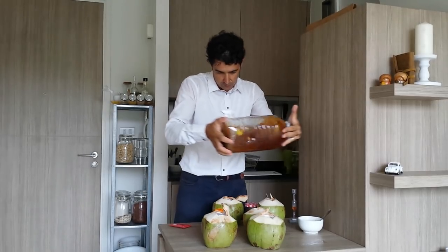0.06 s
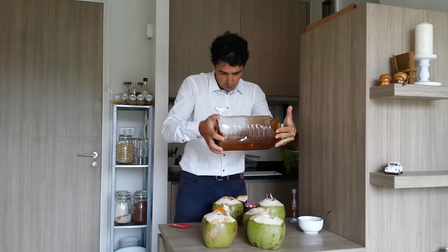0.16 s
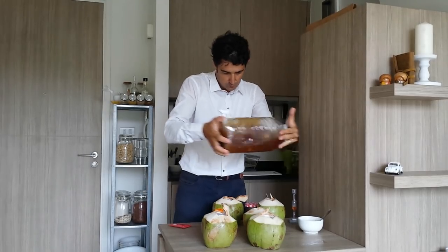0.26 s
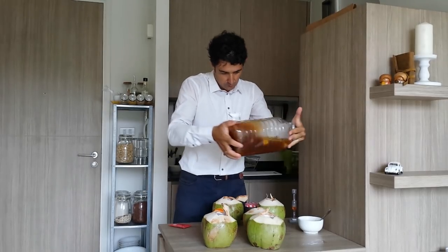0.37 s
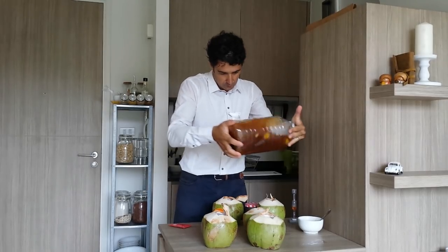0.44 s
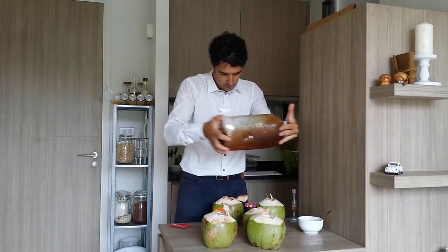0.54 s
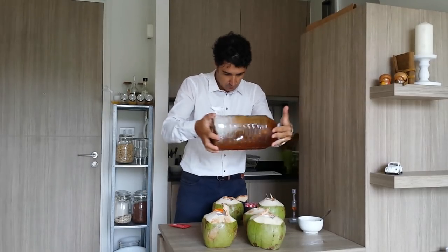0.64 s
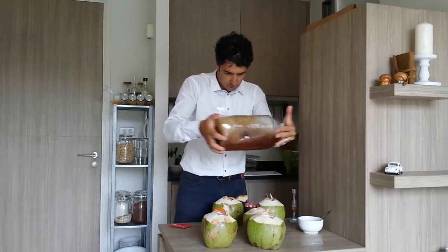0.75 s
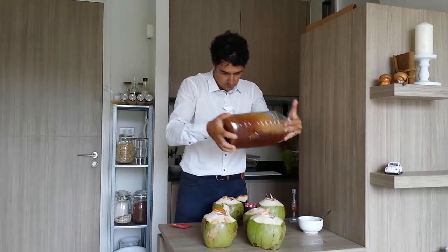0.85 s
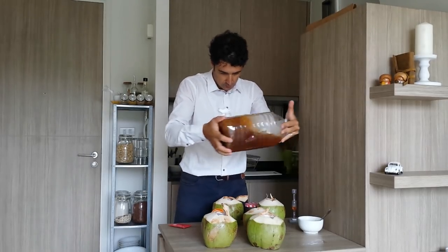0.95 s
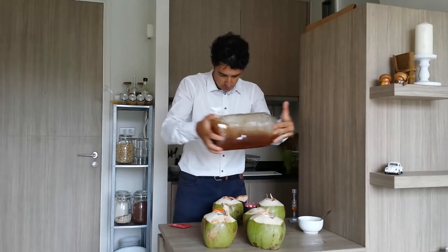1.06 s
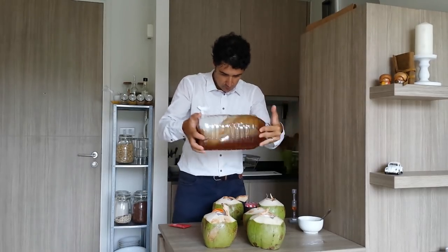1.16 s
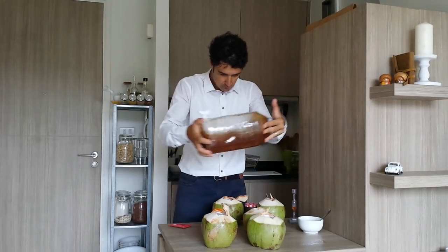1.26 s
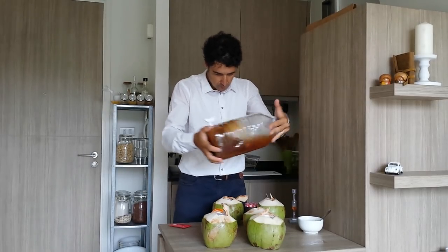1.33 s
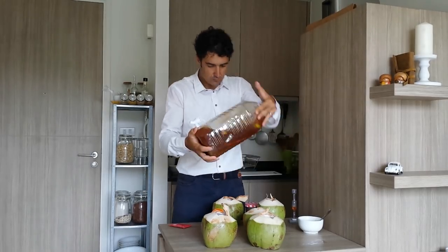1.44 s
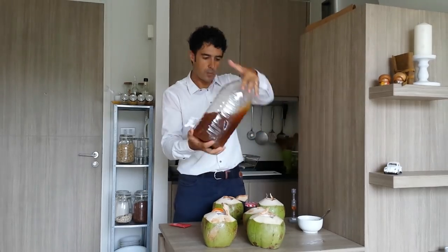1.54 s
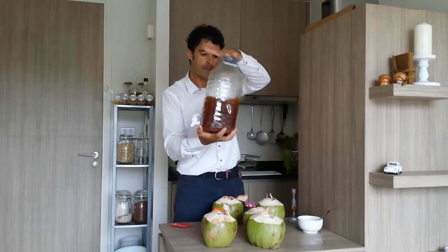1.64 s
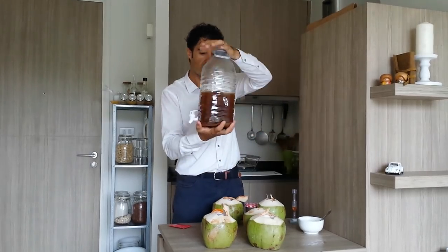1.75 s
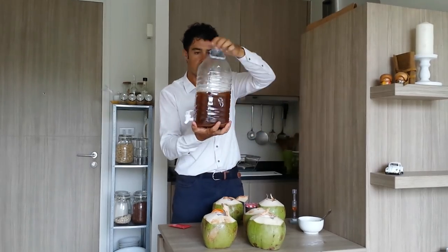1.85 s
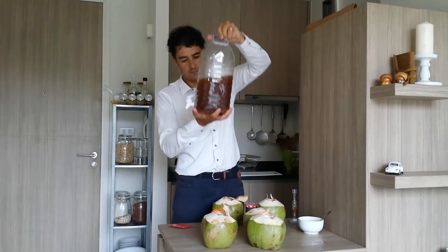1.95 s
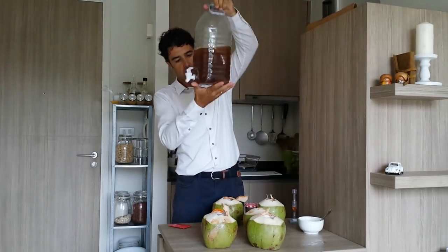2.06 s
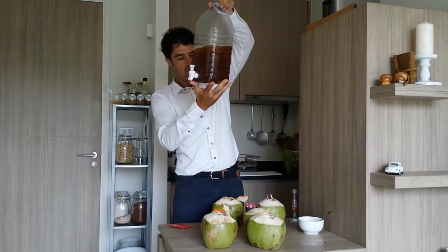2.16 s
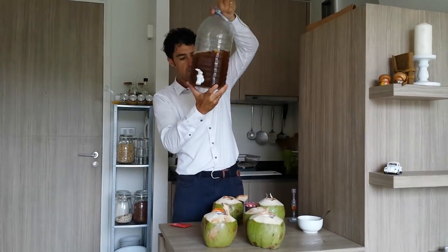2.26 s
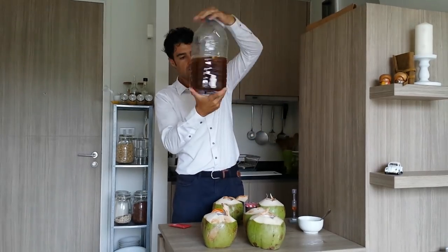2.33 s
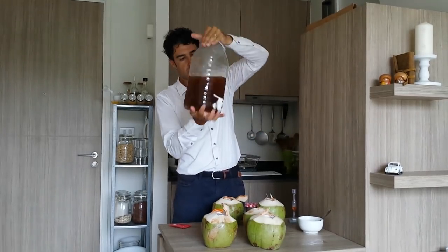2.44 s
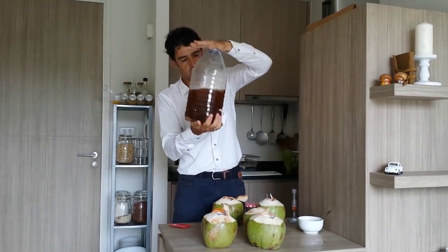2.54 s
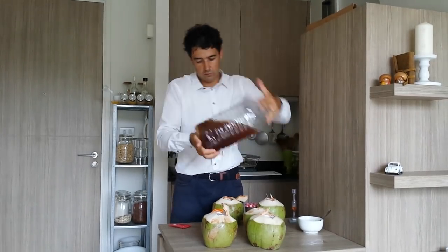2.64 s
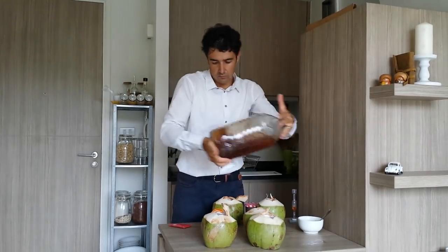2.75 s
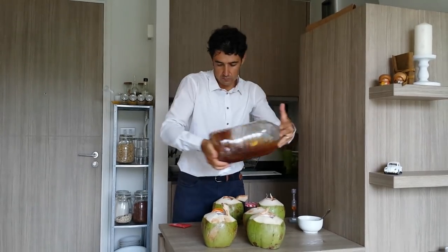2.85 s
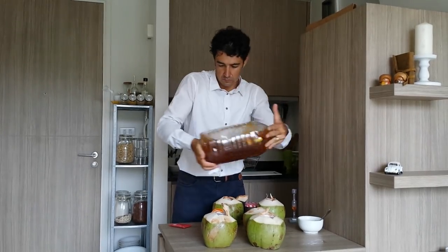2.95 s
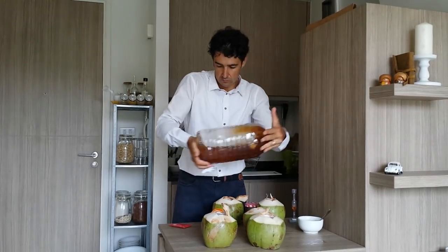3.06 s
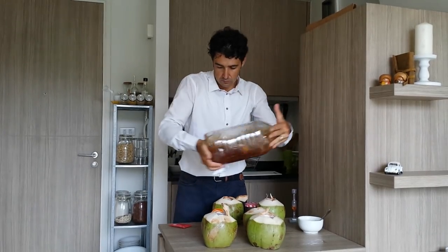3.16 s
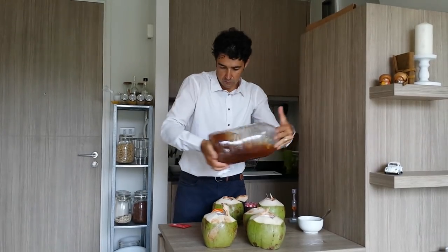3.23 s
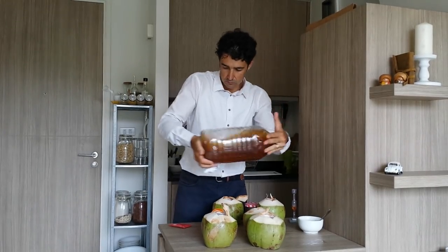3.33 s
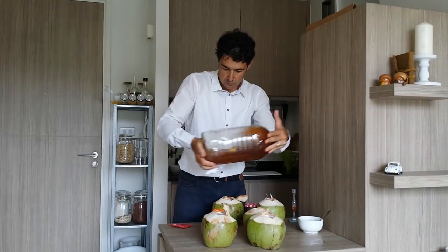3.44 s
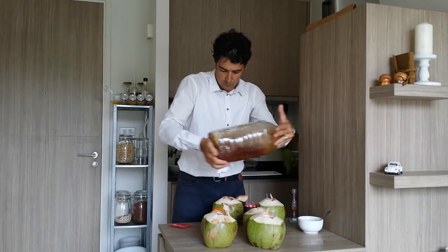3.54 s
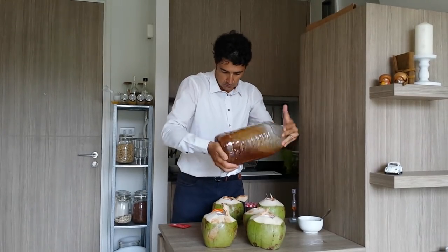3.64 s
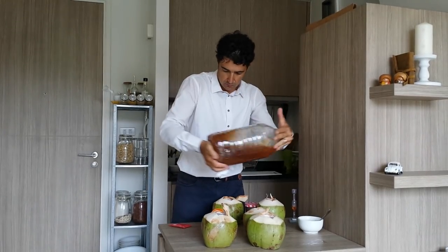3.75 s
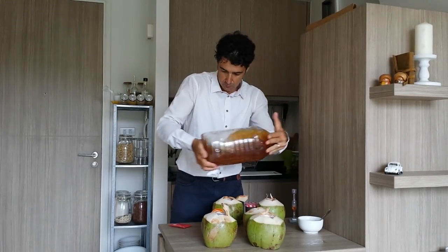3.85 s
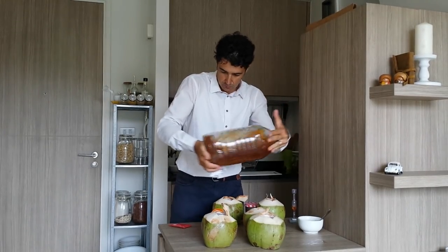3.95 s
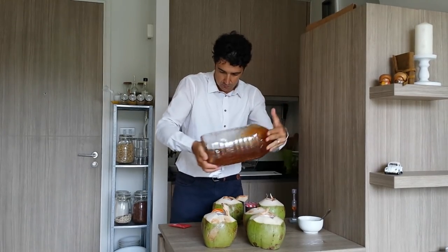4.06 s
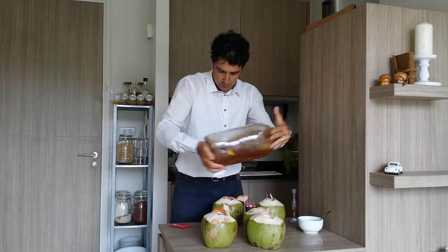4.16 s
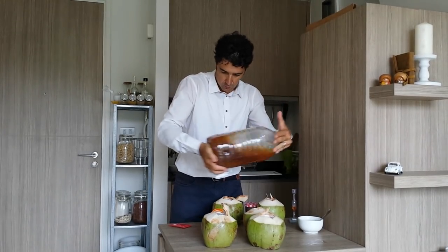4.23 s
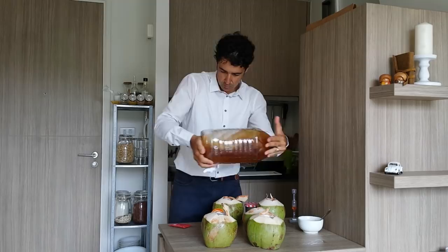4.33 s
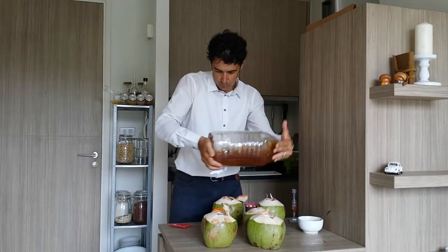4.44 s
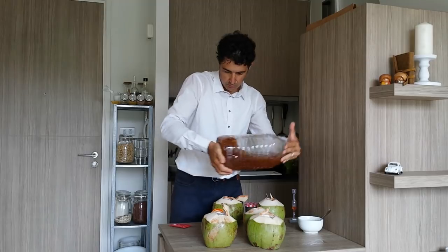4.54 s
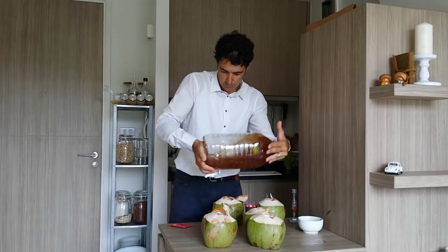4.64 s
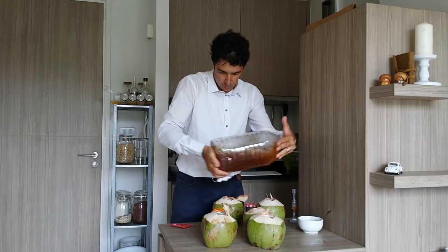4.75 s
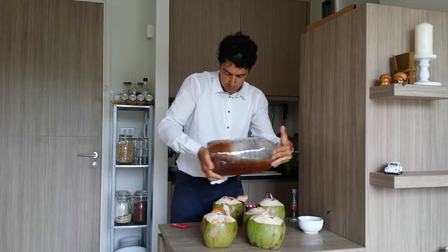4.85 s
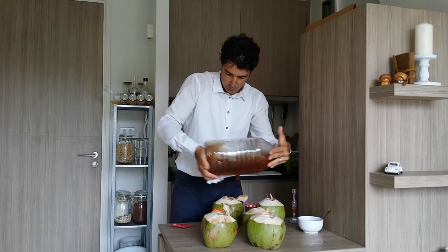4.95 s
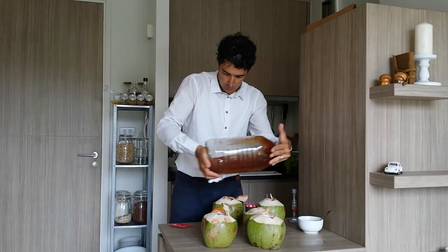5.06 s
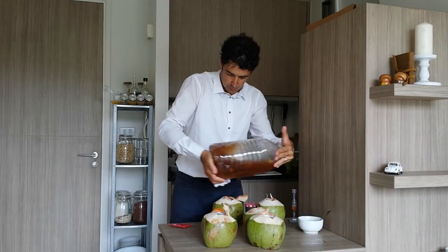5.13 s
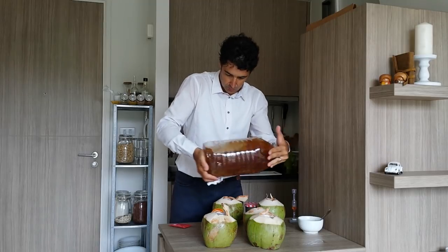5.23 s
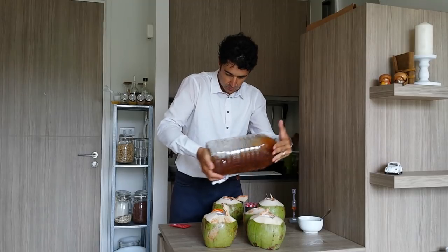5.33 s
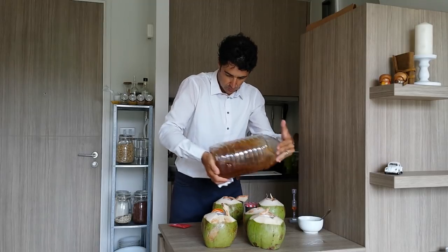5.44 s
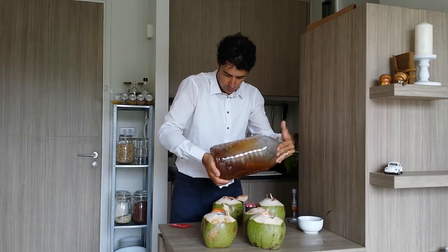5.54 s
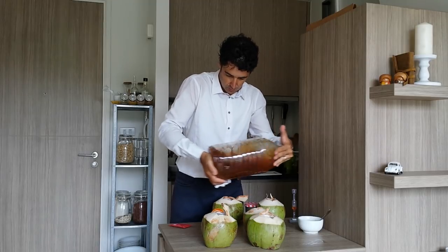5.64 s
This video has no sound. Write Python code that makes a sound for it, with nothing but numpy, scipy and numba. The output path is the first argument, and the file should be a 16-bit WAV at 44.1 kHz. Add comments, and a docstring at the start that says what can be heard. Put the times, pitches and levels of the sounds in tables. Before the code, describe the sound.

A large half-full plastic bottle is shaken hard in a small kitchen, liquid slapping end to end about sixteen times a second. After a second and a half it slows into a few slops, then nearly quiet with faint hand bumps and one plastic pop. Vigorous shaking resumes to the end with a tiny hitch or two. Fairly close microphone, short dense reflections.

```python
"""A big plastic bottle, half full, is shaken hard by hand in a small kitchen.
Splashes come as swarms of chirping bubbles and noise of spray, foam and churn; gulps of air and wall knocks ring.
In a pause the bottle is held upright: damped sines and noise bursts make the hands' bumps and one wall snap.
Then the shaking goes on. Dense reflections and a faint room tone surround it all."""
import sys
import numpy as np
from scipy import signal
from scipy.fft import rfft, irfft, next_fast_len
from scipy.io import wavfile
from scipy.ndimage import map_coordinates
from numba import njit

SR = 44100
rng = np.random.default_rng(int(sys.argv[2]) if len(sys.argv) > 2 else 0)


def bounce(signal):
    """Save signal as a 16-bit WAV file at the path given by the first command-line argument."""
    frames = np.transpose(np.atleast_2d(signal))
    limited = np.clip(frames, -1, 1)
    pcm = np.round(limited * 32767).astype(np.int16)
    wavfile.write(sys.argv[1], SR, pcm)


N = 250929

CHURN_HZ, GURGLE_HZ, SPRAY_HZ = 289, 692, 1940   # where each part of a splash rules


def from_db(db):
    """Decibels to amplitude gain."""
    return 10 ** (np.asarray(db) / 20)


def rms_one(x):
    """Scale to rms 1."""
    return x / np.sqrt(np.mean(x ** 2) + 1e-20)


def butter(x, order, hz, kind="low"):
    """Butterworth filter."""
    return signal.sosfilt(signal.butter(order, hz, kind, fs=SR, output="sos"), x)


def add(out, at_s, sound):
    """Mix a sound in at a time."""
    start = max(round(at_s * SR), 0)
    out[start:start + len(sound)] += sound[:max(len(out) - start, 0)]


def colour(x, spectrum, air_db=0, air_hz=792.8, air_width_hz=48.1):
    """Minimum-phase filter: a spectrum plus the air space's resonance; white noise keeps its power."""
    size = 2 * next_fast_len(N // 2 + 4096)
    hz = np.maximum(np.arange(size // 2 + 1) * SR / size, 1)
    points_hz, points_db = np.transpose(spectrum)
    db = np.interp(np.log(hz), np.log(points_hz), points_db)
    db = db + air_db / (1 + (2 * (hz - air_hz) / air_width_hz) ** 2)
    cepstrum = irfft(np.log(rms_one(from_db(db))))[:size // 2]
    cepstrum[1:] *= 2   # folding makes it causal
    response = np.exp(rfft(cepstrum, size))
    return irfft(rfft(x, size) * response)[:N]


def ring(hz, t60_s, attack_s, rise=0):
    """A damped sine whose pitch climbs by the share `rise` while it dies."""
    t = np.arange(int(t60_s * SR) + 1) / SR
    tone = np.sin(2 * np.pi * hz * t * (1 + rise * t / t60_s / 2))
    return tone * from_db(-60 * t / t60_s) * (1 - np.exp(-t / attack_s))


def splashes(slop_churn_db=-6.5, return_length=0.77, return_gurgle=1, return_churn=2.95):
    """Throws and returns differ in brightness and length: rows (s, length s, spray, gurgle, churn dB)."""
    # even shaking, a throw against one end and a return against the other:
    # first_throw_s, end_s, period_s, return_delay_periods, length_s, return_dullness_db
    shaking = [(0.008, .76, 0.1044, 0.504, 0.0845, 2), (.785, 1.45, 0.1226, 0.508, 0.0627, -1),
               (2.821, 4.42, .1244, 0.5627, 0.05724, 2.5), (4.63, 5.2, 0.1558, 0.4845, 0.077, 1.5),
               (5.233, 5.72, 0.124, 0.536, 0.0529, -0.5)]
    # vigour of the arms: time_s, spray_db (before dullness)
    effort = [(0, -34.5), (.29, -41), (.34, -32.5), (.45, -35), (.56, -34.5), (.64, -37.5), (.79, -31),
              (.92, -31.5), (1.04, -35.5), (1.11, -37.5), (1.22, -32.5), (1.36, -32), (2.82, -34),
              (2.95, -34.5), (3.03, -38.5), (3.13, -31.5), (3.35, -35), (3.47, -30), (3.65, -34.5),
              (3.8, -33), (4.32, -32), (4.63, -41.5), (4.79, -35), (5.02, -35.5), (5.33, -32), (5.69, -34)]
    # air folded in, relative to spray (before dullness): time_s, gurgle_db, churn_db
    folding = [(0, 5, 3), (.3, -0.5, -6), (.38, -13, 3.5), (.55, 6.5, -2.5), (.7, -5, -9), (1.0, 3, -7),
               (1.4, -0.5, -1), (2.82, 5, -5), (3.15, 4.5, -3), (3.55, 3, 0.5), (4.3, 1, 1), (5.0, 3.5, 2),
               (5.69, 3, 1)]
    # single slops as the bottle turns or changes pace:
    # crest_s, length_s, spray_db, gurgle_db (relative to spray)
    slops = [(1.450, 0.049, -57.5, -1.5), (1.496, 0.0313, -40, 9.5), (1.551, 0.0308, -34.5, 7),
             (1.631, 0.0118, -53.5, -4.5), (2.724, 0.074, -47.5, -20.5), (2.774, 0.027, -41.5, 5),
             (4.479, .087, -40.5, 6), (4.529, 0.045, -39, 2.5)]

    rows = [(*slop, slop_churn_db) for slop in slops]
    effort_s, sprays_db = np.transpose(effort)
    fold_s, gurgles_db, churns_db = np.transpose(folding)
    for first_s, end_s, period_s, delay, length_s, dull_db in shaking:
        throws_s = np.arange(first_s, end_s, period_s)
        returns_s = np.arange(first_s + delay * period_s, end_s, period_s)
        strokes = [(s, length_s, -dull_db / 2) for s in throws_s]
        strokes += [(s, length_s * return_length, dull_db / 2) for s in returns_s]
        for s, span_s, dull in strokes:
            spray_db = np.interp(s, effort_s, sprays_db) - dull
            gurgle_db = np.interp(s, fold_s, gurgles_db) + return_gurgle * dull
            churn_db = np.interp(s, fold_s, churns_db) + return_churn * dull
            rows.append((s, span_s, spray_db, gurgle_db, churn_db))
    return rows


def surge(rise=2.954, fall=1.247):
    """Strength of churn, gurgle and spray in time: each splash swells fast and drains more slowly."""
    t = np.arange(0, N, 32) / SR
    power = np.zeros((3, len(t)))
    for crest_s, length_s, spray_db, gurgle_db, churn_db in splashes():
        age = (t - crest_s) / length_s
        swell = np.exp(-(age * np.where(age < 0, rise, fall)) ** 2)
        parts_db = spray_db + np.array([churn_db, gurgle_db, 0])
        power += np.outer(from_db(parts_db), swell) ** 2
    return np.array([np.interp(np.arange(N) / SR, t, np.sqrt(p)) for p in power])


@njit
def ring_swarm(start, step, height, life, rise, size):
    """Sum of bubbles: damped sines that climb in pitch (step in radians, life in samples)."""
    out = np.zeros(size)
    for k in range(len(start)):
        for i in range(min(int(5 * life[k]), size - start[k])):
            age = i / life[k]
            out[start[k] + i] += height[k] * np.exp(-age) * np.sin(step[k] * i * (1 + rise * age))
    return out


def bubbles(strength, cycles=1.304, cycles_growth=0.405, spread_db=4.0, rise=0.0248, count=30000):
    """Bubbles of all sizes are born under the splashes; small ones ring for more cycles."""
    draw = rng.random((count, 3))
    start = (draw[:, 0] * N).astype(np.int64)
    hz = np.square(10 + 70 * draw[:, 1])
    life_cycles = cycles * (hz / GURGLE_HZ) ** cycles_growth * 2 ** (2 * draw[:, 2] - 1)
    life = life_cycles * SR / hz
    part = np.interp(np.log(hz), np.log([CHURN_HZ, GURGLE_HZ, SPRAY_HZ]), np.arange(3))
    size = rms_one(from_db(spread_db * np.clip(rng.standard_normal(count), -2.2, 2.2)))
    # equal power in every Hz
    energy = np.sqrt(hz) / np.mean(np.sqrt(hz)) * N / count * np.ptp(hz) / (SR / 2)
    height = 2 * size * np.sqrt(energy / life) * map_coordinates(strength, [part, start], order=1)
    height *= rng.choice([-1, 1], count)
    return ring_swarm(start, 2 * np.pi * hz / SR, height, life, rise, N)


def spray(strength, drops_per_s=1200, spread_db=6.0, drops_db=-5.0, drops_top_hz=7000,
          rush_db=-4.5, churn_db=-5.5):
    """Drops patter on the wall over the rush of foam; the bulk of the liquid rumbles below."""
    size = from_db(spread_db * np.clip(rng.standard_normal(N), -2.2, 2.2)) * rng.choice([-1, 1], N)
    drops = rms_one(size * (rng.random(N) < drops_per_s / SR))
    drops = butter(drops, 2, drops_top_hz)   # a drop lands softly
    rush = from_db(rush_db) * rng.standard_normal(N)
    top = (from_db(drops_db) * drops + rush) * strength[-1]
    low = from_db(churn_db) * rng.standard_normal(N) * strength[0]
    return butter(top, 2, 900, "high") + butter(low, 2, 170)


def splashing_liquid(strength):
    """Bubbles and spray are coloured by the bottle and the air space above the liquid."""
    # spectrum through the bottle: freq_hz, density_db_per_hz
    through_bottle = [(25, -22.5), (60, -11), (105, -10.5), (136, -0.5), (170, -4), (270, 1), (450, -4.5),
                      (1000, -9), (2000, -11.5), (3700, -14.5), (5200, -24.5), (7800, -27), (11500, -36.5),
                      (15500, -47)]
    return colour(from_db(-2.5) * bubbles(strength) + spray(strength), through_bottle, air_db=6.5)


def foam(strength, settle_s=0.059, level_db=-27.0):
    """Froth keeps fizzing finely between the splashes."""
    # froth spectrum: freq_hz, density_db_per_hz
    fizz = [(500, -7), (3000, 4), (8000, -18.5), (15000, -10.5)]
    keep = np.exp(-1 / (settle_s * SR))
    froth = signal.lfilter([1 - keep], [1, -keep], strength[-1])
    return from_db(level_db) * np.sqrt(froth * strength[-1]) * colour(rng.standard_normal(N), fizz)


def gulps(attack_s=0.00364, rise=0.2):
    """Big pockets of air pinch off and ring low for a short time; the air space above the liquid rings higher,
    near 700 Hz to 1.1 kHz. All rise in pitch."""
    # gulps, low ones from air pockets, high ones from the air space: start_s, pitch_hz (at onset), level_db
    # (before attack), t60_s
    gulp_rows = [(.343, 258.3, -19, 0.112), (0.404, 287.5, -19.5, 0.025), (.545, 1076, -18.5, 0.0328),
                 (.577, 332, -19, 0.0625), (.790, 254.6, -15.5, 0.049), (1.037, 835, -17.5, 0.0286),
                 (1.494, 732.3, -29.5, 0.122), (1.553, 303, -27, 0.055), (3.147, 325, -19.5, 0.034),
                 (3.433, 787.4, -16, 0.0396), (3.507, 237.4, -20, 0.0434), (3.523, 366, -20, 0.0267),
                 (3.554, 258, -15.5, 0.039), (3.643, 335.4, -19.5, 0.051), (3.765, 314, -14, 0.0307),
                 (3.907, 403, -23.5, 0.051), (4.024, 252.2, -9.5, 0.0276), (4.144, 768, -9, 0.0147),
                 (4.27, 274, -17, 0.0433), (4.715, 253.2, -23.5, 0.055)]
    out = np.zeros(N)
    for start_s, pitch_hz, level_db, t60_s in gulp_rows:
        add(out, start_s, from_db(level_db) * ring(pitch_hz, t60_s, attack_s, rise))
    return out


def blows(softening=0.53):
    """Weaker bumps are duller; slaps vary in ring and crack: rows (s, thud, ring, crack, tick dB)."""
    # hands bump the upright bottle: start_s, thud_db, ring_db
    bumps = [(1.720, -66.5, -50), (1.792, -50.5, -49), (1.872, -73.5, -63), (1.935, -52.5, -42),
             (1.951, -48, -52.5), (2.176, -49, -55), (2.313, -39.5, -33), (2.431, -58, -42),
             (2.485, -49, -48.5)]
    # liquid slaps the wall flat from inside: start_s, ring_db, crack_db
    slaps = [(1.039, -38, -31), (1.493, -49.5, -35.5), (1.625, -59, -46.5), (2.699, -68.5, -45.5),
             (2.814, -48.5, -31.5), (3.432, -43.5, -26.5), (3.765, -42.5, -27), (3.899, -21.5, -49.5),
             (4.142, -42.5, -34.5), (4.187, -32.5, -24), (4.631, -44.5, -41), (4.988, -19.5, -36),
             (5.094, -35, -27.5), (5.237, -37, -31.5)]
    rows = [(2.509, -56, -15.5, -23, -71)]   # the wall pops back once
    hardest_db = max(ring_db for _, _, ring_db in bumps)
    for start_s, thud_db, ring_db in bumps:
        bright_db = ring_db - softening * (hardest_db - ring_db)   # softening: dB lost per dB weaker
        rows.append((start_s, thud_db, ring_db, bright_db - 10, bright_db - 14.5))
    for start_s, ring_db, crack_db in slaps:
        rows.append((start_s, crack_db - 32.5, ring_db, crack_db, crack_db - 5))
    return rows


def knocks(thud_hz=125, thud_t60_s=0.0524, thud_attack_s=0.00172, crack_t60_s=0.0126,
           crinkle_db=-15.0, crinkle_end_s=0.0308, tick_t60_s=0.085, contact_s=0.00113):
    """Blows thud, ring and crack the wall; its ribs crinkle for a moment, the tail falling ever faster."""
    # plastic wall modes: freq_hz, level_db (relative to ring), t60_s
    wall = [(328.8, -12.5, 0.0437), (452.5, -4, 0.0277), (524.67, -16.5, 0.142), (765.7, -17.5, 0.0545),
            (966, -23, 0.056), (2290, -31.5, 0.092), (3164, -29, 0.0165)]
    # crack and crinkle spectrum: freq_hz, density_db_per_hz
    crinkle_spectrum = [(150, -8), (260, -22), (330, -10), (480, -6.5), (680, 2.5), (950, -1.5),
                        (1400, -3.5), (3200, -5.5), (4400, -14.5), (5800, -29.5), (9000, -44),
                        (15000, -41.5)]
    # tick spectrum: freq_hz, density_db_per_hz
    tick_spectrum = [(100, -3), (350, 6.5), (1000, 2.5), (2400, -3.5), (4200, -3.5), (5500, -20),
                     (8000, -15.5), (15000, -48.5)]

    body, crinkles, ticks = np.zeros((3, N))
    t = np.arange(SR // 5) / SR
    crinkle = from_db(-60 * t / crack_t60_s)
    crinkle += from_db(crinkle_db) * np.exp(-np.square(t / crinkle_end_s))
    crinkle *= 1 - np.exp(-t / contact_s)
    for start_s, thud_db, ring_db, crack_db, tick_db in blows():
        add(body, start_s, from_db(thud_db) * ring(thud_hz, thud_t60_s, thud_attack_s))
        for k, (hz, mode_db, t60_s) in enumerate(wall):
            add(body, start_s, (-1) ** k * from_db(ring_db + mode_db) * ring(hz, t60_s, contact_s))
        add(crinkles, start_s, from_db(crack_db) * crinkle * rng.standard_normal(len(t)))
        add(ticks, start_s, from_db(tick_db - 60 * t / tick_t60_s) * rng.standard_normal(len(t)))
    return body + colour(crinkles, crinkle_spectrum) + colour(ticks, tick_spectrum)


def kitchen(x, wet_db=-4.0, t60_s=0.1443, first_echo_s=.002, lowest_hz=250, size=512):
    """Dense reflections; their pattern is drawn afresh every few milliseconds, so no tone stands out."""
    t = np.arange(SR // 6) / SR
    decay = from_db(-60 * t / t60_s) * (t > first_echo_s)
    window = np.sin(np.pi / 2 * np.sin(np.pi * np.arange(size) / size) ** 2)
    echo_source = butter(x, 2, lowest_hz, "high")   # the echoes carry little bass
    padded, echoes = np.pad(echo_source, size), np.zeros(N + 2 * size)
    for start in range(0, N + size, size // 2):
        response = decay * rng.standard_normal(len(t)) / np.linalg.norm(decay)
        grain = padded[start:start + size] * window
        add(echoes, start / SR, signal.fftconvolve(grain, response))
    return (x + from_db(wet_db) * echoes[size:-size]) / np.hypot(1, from_db(wet_db))


def room_tone(level_db=-72):
    """Steady coloured noise stands for the quiet room."""
    # background spectrum: freq_hz, density_db_per_hz
    background = [(25, -4), (60, 4), (120, 3.5), (200, 3.5), (350, -0.5), (600, -5), (1000, -10),
                  (3500, -19), (6000, -22), (15000, -23.5)]
    return from_db(level_db) * colour(rng.standard_normal(N), background)


def scene():
    """The liquid is heard through the bottle, the bottle through the kitchen."""
    strength = surge()
    bottle = splashing_liquid(strength) + foam(strength) + gulps() + knocks()
    return (kitchen(bottle) + room_tone())[None]


def record(dry):
    """The top is cut steeply."""
    cutoff_hz = 15600
    return signal.sosfilt(signal.ellip(12, .1, 80, cutoff_hz, fs=SR, output="sos"), dry)


dry = scene()
out = record(dry)
bounce(out)
```